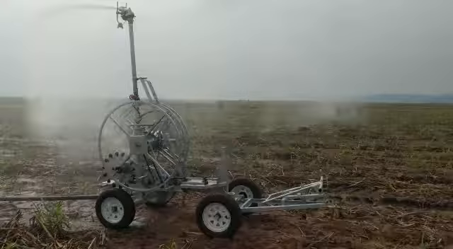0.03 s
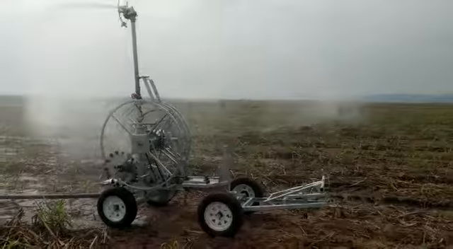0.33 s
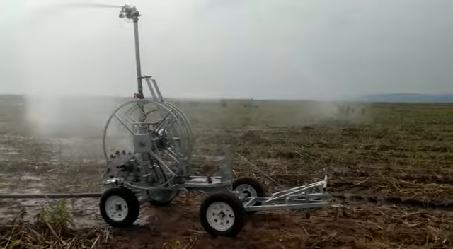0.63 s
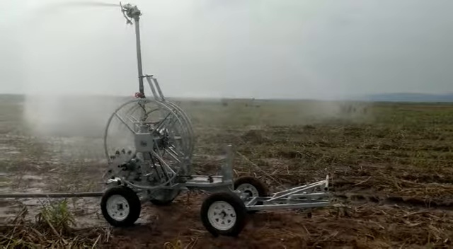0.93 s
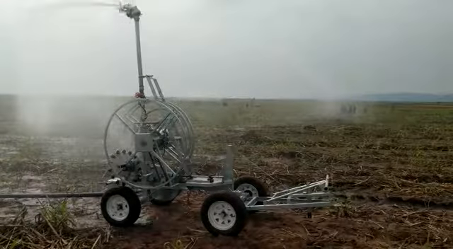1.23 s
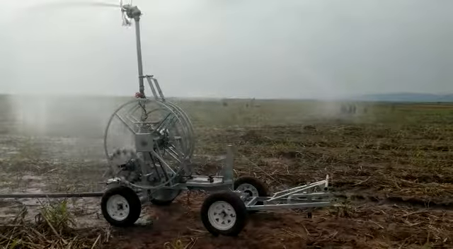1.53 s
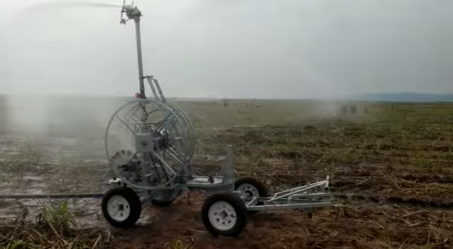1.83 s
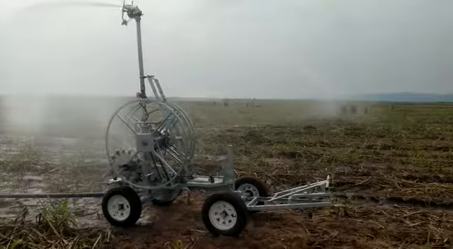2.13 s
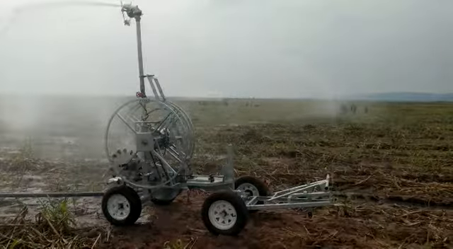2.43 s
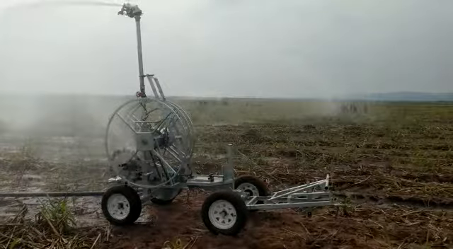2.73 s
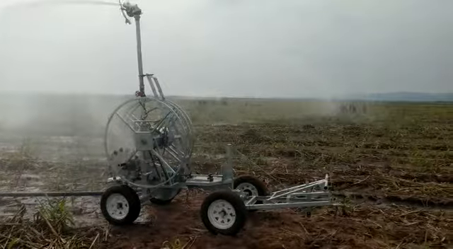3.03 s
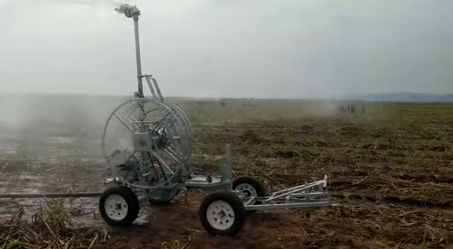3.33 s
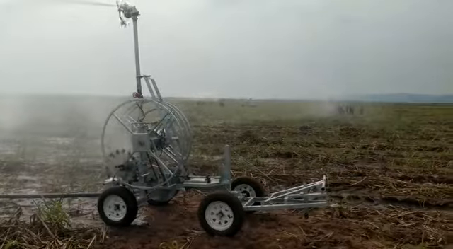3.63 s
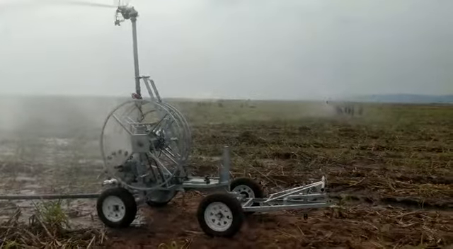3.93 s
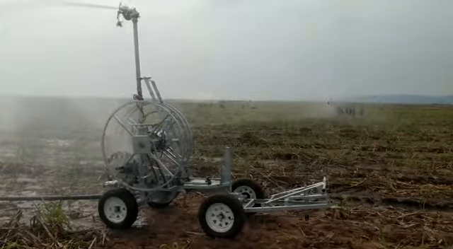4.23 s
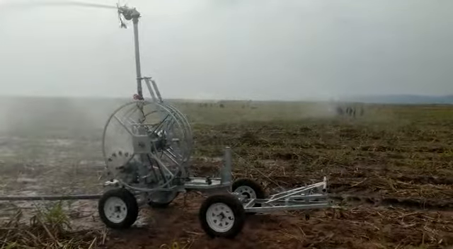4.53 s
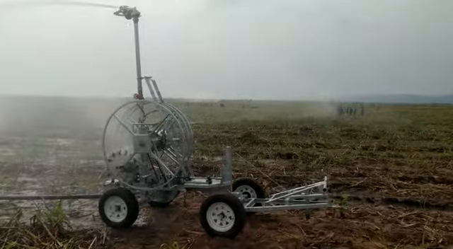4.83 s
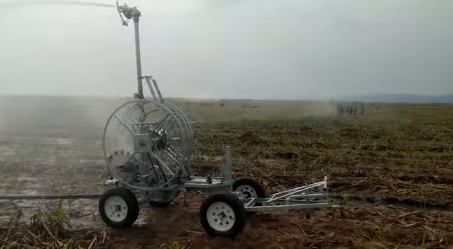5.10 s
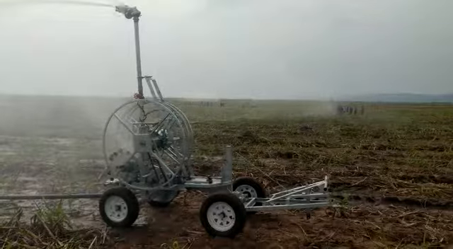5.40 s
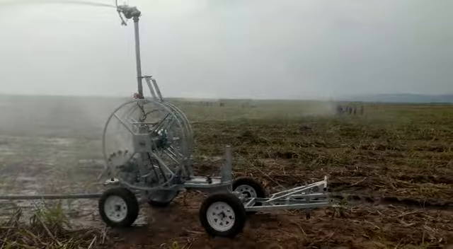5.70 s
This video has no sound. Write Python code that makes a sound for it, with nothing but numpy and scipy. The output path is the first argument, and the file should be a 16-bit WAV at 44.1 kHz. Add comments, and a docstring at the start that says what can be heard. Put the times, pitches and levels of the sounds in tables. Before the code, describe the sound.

Water hisses continuously from a field sprinkler, with regular wet slaps from its swinging arm and a faint machine hum underneath.

```python
"""The sprinkler gun of a travelling irrigator sprays a field, a few metres from a handheld camera.
Its jet hisses and flutters, and twice a second the swinging arm slaps through the water.
Water rushes in the feed pipe and the drive hums steadily; the sound fades in after a short silence."""
import sys
import numpy as np
from scipy.fft import rfft, irfft, next_fast_len
from scipy.io import wavfile
from scipy.ndimage import map_coordinates

SR = 44100
rng = np.random.default_rng(int(sys.argv[2]) if len(sys.argv) > 2 else 0)


def store_wav(level_fs):
    """Save 16-bit WAV to argv[1]."""
    pcm = np.round(np.clip(np.atleast_2d(level_fs), -1, 1) * 32767)
    wavfile.write(sys.argv[1], SR, pcm.T.astype(np.int16))


N = 262836

# the jet's hiss, swelling as the stream breaks up: (s, level dB)
JET_LEVEL = [(0.65, -27.5), (0.76, -30), (0.79, -29), (0.84, -30), (0.96, -26), (0.99, -28.5),
             (1.05, -27), (1.22, -28.5), (1.26, -26.5), (1.3, -29.8), (1.33, -26.5), (1.35, -29.0), (1.53, -26),
             (1.57, -28.5), (1.62, -25.5), (1.67, -28.5), (1.8, -28.0), (1.85, -31), (1.87, -28.5), (2.01, -27.5),
             (2.13, -28.5), (2.18, -27.0), (2.21, -29), (2.27, -27), (2.3, -29), (2.34, -27.8), (2.41, -28.5),
             (2.54, -28.5), (2.9, -29), (2.93, -28), (3.25, -29.5), (3.33, -27.5), (3.37, -30.1), (3.4, -28.5),
             (3.46, -29.5), (3.62, -28), (3.68, -30), (3.71, -29), (3.78, -29.5), (4.09, -29),
             (4.16, -30.5), (4.36, -29), (4.42, -29.5), (4.45, -28.5), (4.73, -30), (4.76, -29),
             (4.92, -30), (4.97, -28.5), (5.01, -31.5), (5.04, -28.5), (5.33, -29), (5.39, -30),
             (5.46, -28.5), (5.48, -31), (5.64, -27.5), (5.73, -30.5), (5.84, -28.5), (5.95, -30)]
# the arm cuts the jet: (s, level dB)
SLAPS = [(0.9, -22.7), (1.42, -22), (1.944, -22.5), (2.467, -20.5), (2.99, -21.5), (3.514, -21.5),
         (4.037, -22.4), (4.564, -23.5), (5.083, -21), (5.584, -24)]
# hiss of the free jet: (Hz, left dB per Hz, right dB per Hz)
JET_COLOUR = [(300, -62, -48), (934, -13.5, -12.5), (1750, -8.5, -13), (2070, -2.5, -6.5), (3590, -11, -9), (3520, -22.5, -14.5), (4430, -19, -13), (5590, -6, -8), (7710, -10, -0.5), (8540, -17.5, -9.5), (8880, -21, -19), (10080, 0.5, -11.5), (11880, -3, -12), (14700, -12.5, -8.5), (15900, -11.5, -10.5)]
# water bursting on the arm: (Hz, left dB per Hz, right dB per Hz)
SLAP_COLOUR = [(153, -52, -50), (508, -13, -12.5), (1080, -19, -16.5), (2070, -11.5, -17), (3080, -8, -11), (3840, -23, -13), (4640, -11, -10.5), (5850, -22.5, -13), (7350, -12, 0), (9130, -24, -21.5), (9920, -3.5, -18), (12600, -16.5, -13.5), (16000, -19, -14.5)]
# rush of water in the pipe and riser: (Hz, dB per Hz)
PIPE_COLOUR = [(28, -34), (60, -22), (135, -20), (168, -7), (190, -13.5), (260, -4), (345, -20), (430, -11), (490, 1), (730, 0.5), (850, -9.5), (1200, -33), (2500, -72.5)]
# how the two microphone ports hear the machine: (Hz, likeness 0-1, left lead radians)
PORTS = [(100, .99, 0), (700, .98, .45), (1200, .85, 1.05), (2200, .72, 1), (3100, .55, .8), (4000, .28, 4), (6200, .51, 4.6), (7500, .33, 5.3), (9000, .31, 9.3), (10700, .45, 8.2), (13500, .38, 8.7), (15700, .28, 12)]  # fixed
# hum of the drive: (multiple of the shaft speed, level dB)
HUM = [(2, -57.5), (3, -78), (4, -63.5), (7, -80)]
SHAFT_HZ = 38.05  # fixed
# the camera's fade-in: start and length (s)
START = 0.6
FADE = 0.21
TOP_HZ = 15950  # fixed
# the dull smack as the arm takes the whole jet: (Hz, dB per Hz)
SMACK_COLOUR = [(150, -29), (500, -4), (1000, -2), (1700, 5), (3000, 2), (3700, -35), (4600, -4.5), (6000, -13), (12000, -8.5)]
# narrow peaks and hollows in the nozzle's hiss: (Hz, width Hz, dB)
NOZZLE = [(1540, 120, -3), (2210, 120, 1.5), (2275, 36, -10), (2440, 100, 4), (2744, 230, -3), (3250, 20, -8.5), (4130, 18, -2.5)]


def amp(db):
    """Decibels to gain."""
    return 10 ** (np.asarray(db) / 20)


def unit(x):
    """x scaled to rms 1."""
    return x / np.sqrt(np.mean(x ** 2) + 1e-20)


def clock():
    """The time of every sample."""
    return np.arange(N) / SR


def along(table, hz):
    """Each value column of a (Hz, ..) table, read on a log axis."""
    f, *columns = np.transpose(table)
    return np.array([np.interp(np.log(hz + 1), np.log(f + 1), c) for c in columns])


def wobble(rate):
    """A smooth random curve with rate knots a second."""
    return map_coordinates(rng.standard_normal(int(N * rate / SR) + 4), [clock() * rate])


def filtered(x, response):
    """x times a complex response of frequency."""
    size = next_fast_len(N + SR // 2)
    return irfft(rfft(x, size) * response(np.fft.rfftfreq(size, 1 / SR)), size)[..., :N]


def droplets(rate, spread_db):
    """Two unrelated streams of droplet ticks of uneven size, rate a second."""
    struck = rng.random((2, N)) < rate / SR
    return unit(struck * np.sign(rng.standard_normal((2, N))) * amp(spread_db * rng.standard_normal((2, N))))


def at_ports(pair, colour):
    """Two unrelated signals become a coloured left and right of rms 1: alike in the bass, apart in the treble."""
    turn = lambda hz: np.arccos(np.clip(along(PORTS, hz)[0], 0, 1)) / 2
    shared, apart = filtered(pair, lambda hz: np.array([np.cos(turn(hz)), np.sin(turn(hz))]))
    lead = lambda hz: np.exp(.5j * np.outer([1, -1], along(PORTS, hz)[1]))
    port = lambda hz: amp(along(colour, hz)) * lead(hz) * (hz < TOP_HZ)
    return unit(filtered(np.array([shared + apart, shared - apart]), port))


def spray(colour, drop_rate, drop_db, clump_rate, clump_db):
    """Fine mist with coarser droplets in it, torn off in clumps a few milliseconds long."""
    water = rng.standard_normal((2, N)) + amp(drop_db) * droplets(drop_rate, spread_db=3.0)
    return at_ports(water * amp(clump_db * wobble(clump_rate)), colour)


def jet(level_db):
    """The stream hisses as it leaves the nozzle, and flutters as it frays."""
    hiss = spray(JET_COLOUR, drop_rate=3000, drop_db=-2.5, clump_rate=350, clump_db=0.96)
    nozzle = lambda hz: amp(sum(db * np.exp(-((hz - centre) / width) ** 2) for centre, width, db in NOZZLE))
    flutter_db = .85 * wobble(55)  # fixed
    return filtered(hiss, nozzle) * amp(level_db + flutter_db - 0.5)


def arm():
    """The arm shears the jet into bright spray; midway the full stream smacks its blade."""
    splash = swells(delay=-0.0012, rise=0.012, fall=.02) * spray(SLAP_COLOUR, drop_rate=3500, drop_db=-9, clump_rate=450, clump_db=1.4)
    smack = swells(delay=0.0026, rise=0.0053, fall=0.0045) * spray(SMACK_COLOUR, drop_rate=1100, drop_db=-3, clump_rate=260, clump_db=3.0)
    return amp(1.53) * splash + amp(-8.5) * (smack + amp(7) * blade(smack, ring_hz=2980, width_hz=140))


def pipe(level_db):
    """Turbulent water drums in the pipe, swelling a little with the jet; every slap of the arm jolts the riser."""
    rush = at_ports(rng.standard_normal((2, N)), PIPE_COLOUR)
    surge_db = .5 * (level_db - level_db.mean()) + .8 * wobble(12)  # fixed
    jolt = swells(delay=0.0033, rise=0.0049, fall=.012) * at_ports(rng.standard_normal((2, N)), PIPE_COLOUR)
    return rush * amp(surge_db - 43.0) + amp(-15) * jolt


def drive():
    """Low orders of the shaft hum cleanly; a narrow, unsteady whine rides above them."""
    angle = 2 * np.pi * SHAFT_HZ * clock() + 0.011 * wobble(3.8)
    hum = sum(np.sqrt(2) * amp(db) * np.sin(round(k) * angle + rng.uniform(0, 2 * np.pi)) for k, db in HUM)
    whine_hz = 494
    sway = wobble(13) + 1j * wobble(14)
    whine = unit(np.real(sway * np.exp(2j * np.pi * whine_hz * clock())))
    return hum + amp(-55) * whine


def swells(delay, rise, fall):
    """A pointed swell for every swing of the arm; times in seconds."""
    contact = np.zeros(N)
    for s, db in SLAPS:
        t = clock() - s - delay
        contact += amp(db) * np.exp(-np.abs(t / np.where(t < 0, rise, fall)) ** 1.06)
    return contact


def blade(smack, ring_hz, width_hz):
    """The wet metal blade rings briefly in one damped mode."""
    return filtered(smack, lambda hz: 1j * hz * width_hz / (ring_hz ** 2 - hz ** 2 + 1j * hz * width_hz))


def scene():
    """Jet, arm, pipe and drive in the open field, with no walls to answer."""
    level_db = np.interp(clock(), *np.transpose(JET_LEVEL))
    return jet(level_db) + arm() + pipe(level_db) + drive()


def record(dry):
    """The camera fades its sound in and keeps nothing above its band limit."""
    fade = np.clip((clock() - START) / FADE, 0, 1)
    return filtered(dry * fade, lambda hz: np.clip((TOP_HZ - hz) / 200, 0, 1))  # fixed


dry = scene()
out = record(dry)
store_wav(out)
```